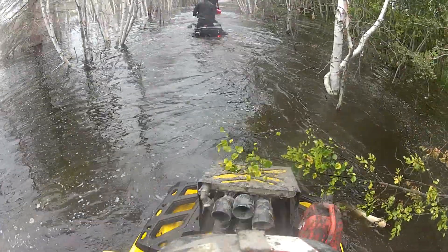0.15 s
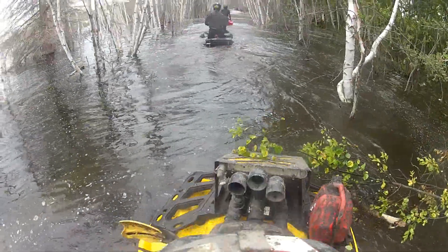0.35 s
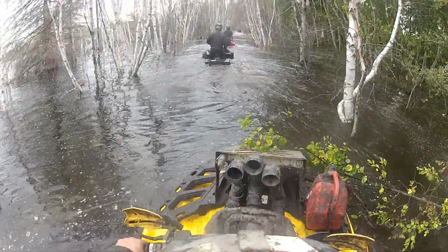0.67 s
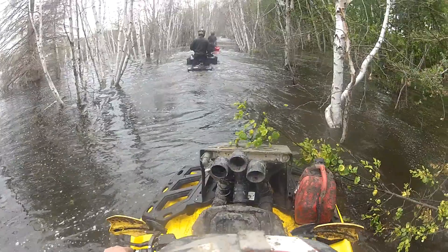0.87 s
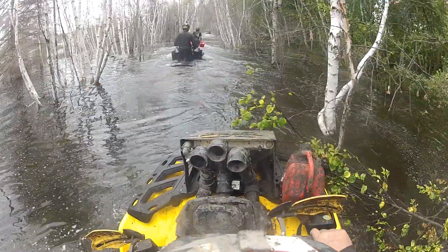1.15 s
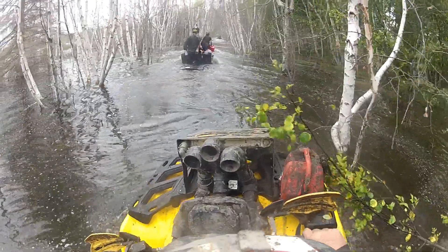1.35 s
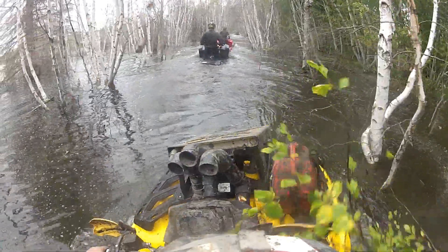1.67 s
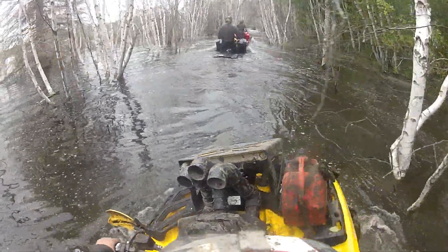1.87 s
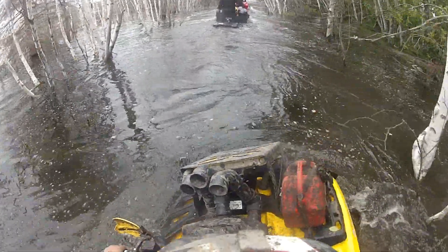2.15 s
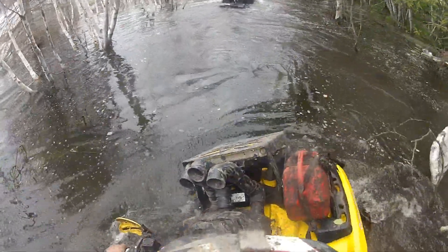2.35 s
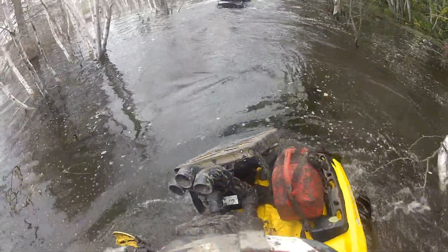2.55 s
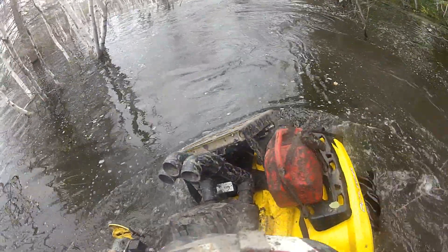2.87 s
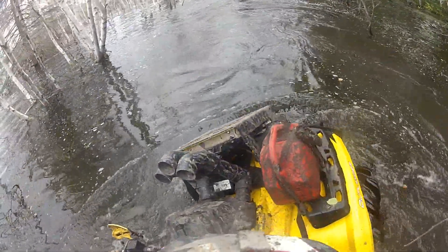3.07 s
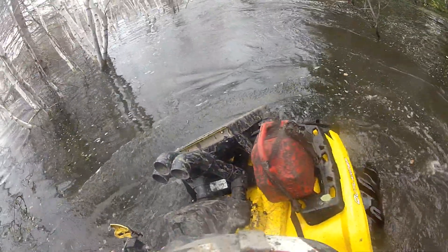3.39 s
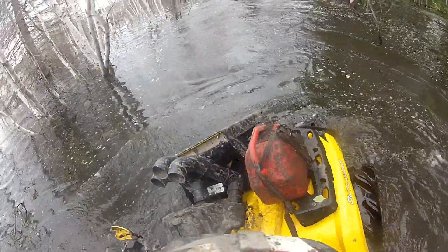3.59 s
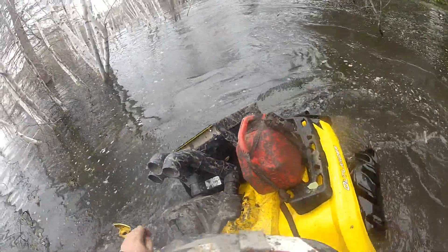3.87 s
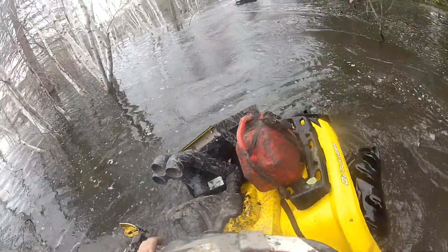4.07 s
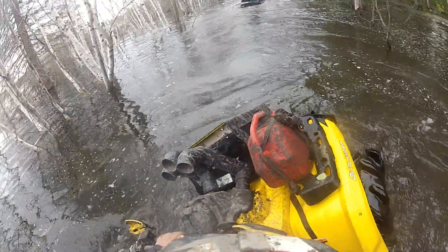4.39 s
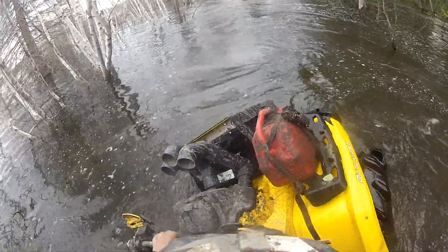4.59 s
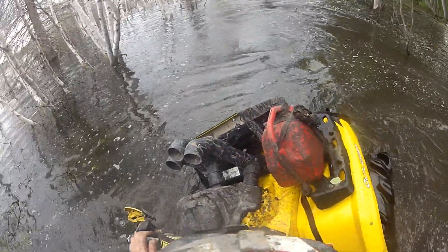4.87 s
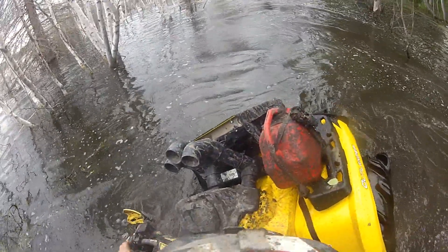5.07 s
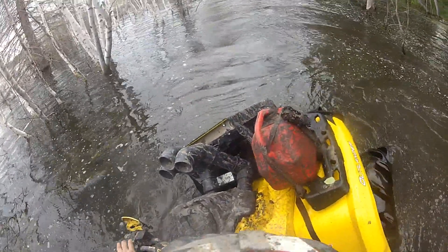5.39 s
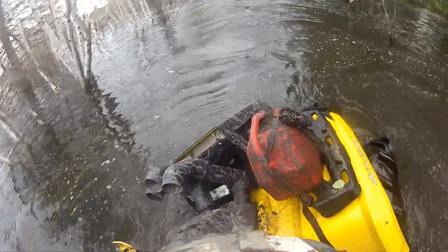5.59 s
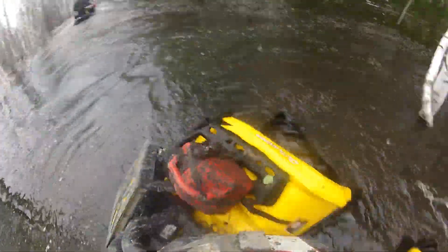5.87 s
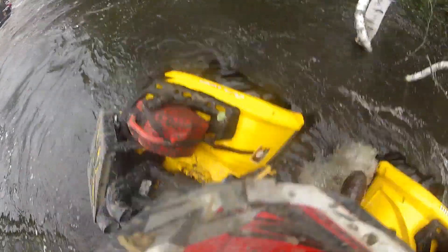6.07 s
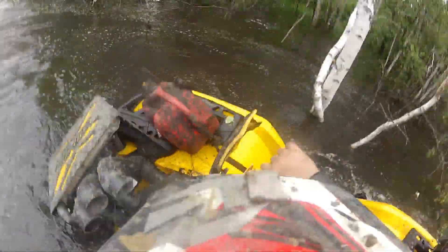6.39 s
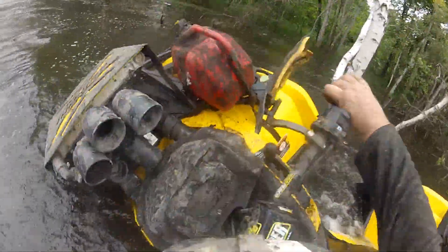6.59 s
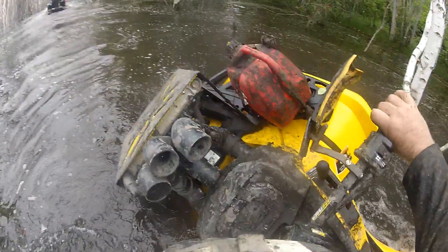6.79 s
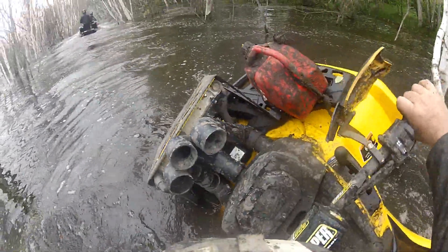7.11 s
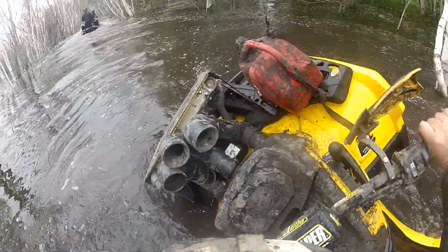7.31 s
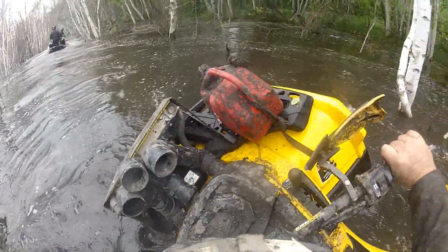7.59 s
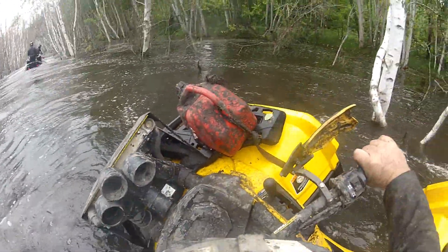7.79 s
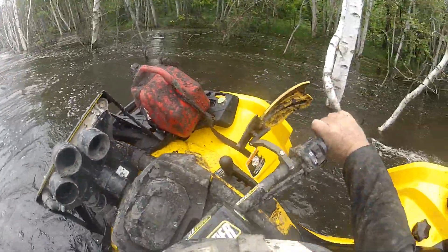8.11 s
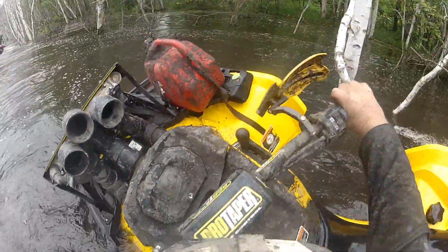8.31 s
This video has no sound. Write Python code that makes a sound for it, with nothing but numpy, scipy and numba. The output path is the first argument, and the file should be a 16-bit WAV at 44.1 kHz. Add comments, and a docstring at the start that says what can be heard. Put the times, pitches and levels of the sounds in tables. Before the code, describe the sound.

Close, muffled sound from a helmet camera: a V-twin quad pulls hard with a gurgling, growling exhaust through floodwater, then bogs down to a slow chug. A similar engine drones ahead. Water hisses around the wheels. Twigs snap against the housing just before two seconds; around six seconds come violent scrapes and thuds, and the engine revs up again, bubbling.

```python
"""Quad wading through a flooded wood

Heard from a camera microphone in a housing on the rider's helmet: a V-twin whose uneven firings ring the
exhaust and blow rising bubbles under water. A second, similar engine drones ahead as filtered firing pulses.
The wheels churn up hiss, droplets and spray, made of noise and tiny impacts, over a faint low rumble.
Twigs scratch and knock the housing, ringing its modes; the camera's limiter ducks after the hardest knocks."""
import sys
import numpy as np
from scipy import signal
from scipy.fft import rfft, irfft, next_fast_len
from scipy.io import wavfile
from scipy.ndimage import uniform_filter1d
from numba import njit

SR = 44100
rng = np.random.default_rng(int(sys.argv[2]) if len(sys.argv) > 2 else 0)


def output_pcm(signal):
    """Save a mono or channel-first signal as 16-bit PCM at the path in sys.argv[1].

    Samples are clipped to [-1, 1] before scaling.
    """
    pcm = np.clip(np.atleast_2d(signal).T, -1, 1) * 32767
    wavfile.write(sys.argv[1], SR, np.round(pcm).astype(np.int16))


N = 372644
T = np.arange(N) / SR  # time of each sample, s


def undb(db):
    """Decibels to gain."""
    return 10 ** (np.asarray(db) / 20)


def curves(rows):
    """Each column of a table after its times, joined by straight lines."""
    times, *columns = np.transpose(rows)
    return [np.interp(T, times, column) for column in columns]


def unit(x):
    """Scaled to rms 1."""
    return x / np.sqrt(np.mean(x ** 2) + 1e-18)


def even(x, span_s):
    """Scaled to about rms 1 over every stretch of span_s; quicker flutter stays."""
    size = max(int(span_s * SR), 200)
    power = uniform_filter1d(uniform_filter1d(x ** 2, size), size)
    return x / np.sqrt(np.abs(power) + 1e-12)


def band(x, hz, width, order=1):
    """A resonance with gain 1 at its centre; higher orders have steeper sides."""
    low = np.hypot(hz, width / 2) - width / 2
    sos = signal.butter(order, [low, low + width], "band", fs=SR, output="sos")
    return signal.sosfilt(sos, x + 1e-18)


def colour(x, tone):
    """Filter by a spectrum of (pitch_hz, level_db) points, joined on a log pitch scale."""
    hz, db = np.transpose(tone)
    size = next_fast_len(N)
    bins = np.maximum(np.fft.rfftfreq(size, 1 / SR), 1)
    gain = undb(np.interp(np.log(bins), np.log(hz), db))
    return irfft(rfft(x, size) * gain, size)[:N]


def walk(rate):
    """Slow chance of rms 1: random levels held 1 / rate s and slewed twice."""
    size = int(SR / rate)
    steps = np.repeat(rng.standard_normal(N // size + 1), size)
    return unit(uniform_filter1d(uniform_filter1d(steps, size), size)[:N])


def humps(rows):
    """A sum of bell-shaped swells, one for each (centre_s, length_s, height)."""
    return sum(height * np.exp(-((T - s) / length) ** 2) for s, length, height in rows)


def clicks(times, sizes):
    """One impulse at each time."""
    return np.bincount(np.clip(times * SR, 0, N).astype(int), sizes, N + 1)[:N]


def grains(per_s, spread):
    """Random tiny impacts of either sign, with levels on average 'spread' dB above the faintest."""
    place, sign, luck = rng.random((int(per_s * N / SR), 3)).T
    sizes = undb(-spread * np.log(np.maximum(luck, .001)))  # many faint, a few strong
    return unit(clicks(place * N / SR, np.sign(sign - .5) * sizes))


def firings(hz, second_db, scatter_db, jitter_s):
    """Times and strengths of the firings of a V-twin: its cylinders fire 280 and 440 degrees apart."""
    cycles = np.cumsum(hz) / SR  # four-stroke cycles of 720 degrees
    turns = (np.arange(int(cycles[-1]) + 1)[:, None] + [0, 280 / 720]).ravel()
    late, strength = rng.standard_normal((2, len(turns)))
    times = np.interp(turns, cycles, T, right=2 * T[-1]) + jitter_s * late
    is_second = np.arange(len(turns)) % 2
    return times, undb(second_db * is_second + scatter_db * strength)


def rumble():
    """The helmet shakes faintly with the ride: deep noise around 24 Hz that slowly drifts in level."""
    shake = unit(band(rng.standard_normal(N), 24, 26, order=2))
    return undb(-42.0) * shake * undb(2 * walk(1.2))


def leader():
    """The same kind of engine, further off: firing pulses coloured by one fixed spectrum."""
    # the quad ahead: time_s, engine_cycles_hz, level_db
    ride = [(0, 29.01, -19), (1.3, 29.61, -20), (1.8, 29.51, -29.5), (2.3, 29.06, -21), (2.75, 29.1, -23.5),
            (3.2, 30.24, -21.5), (3.9, 30.72, -28), (4.6, 30.11, -19.5), (6.3, 28.38, -19),
            (7.0, 28.52, -21), (7.6, 28.5, -22.5), (8.45, 28.82, -34.5)]
    # its tone at the microphone: pitch_hz, level_db
    tone = [(40, -56), (70, -8.5), (120, 4), (175, 1.5), (240, -1.5), (300, -3), (380, -12), (520, -7),
            (640, -13.5), (800, -23), (2000, -71.5)]
    hz, db = curves(ride)
    pulses = clicks(*firings(hz, second_db=0.5, scatter_db=4.0, jitter_s=.00008))
    return undb(db) * unit(colour(pulses, tone))


def water():
    """Wheels churn the water: a fluttering hiss with droplets in it, which swells with every wave."""
    # water as heard through the housing: pitch_hz, level_db
    tone = [(300, -3), (700, -0.5), (1200, -1), (1600, -2.5), (2300, -4.5), (2900, -1), (3500, -10),
            (4300, -17.5), (4900, -14), (6000, -29.5), (7200, -22), (9500, -18.5), (13500, -34),
            (16000, -34.5)]
    # waves pushed up as the quad moves off or lurches: crest_s, level_db, rise_s, fall_s
    waves = [(.4, -40, .3, 0.57), (1.25, -33.5, 0.83, 0.52), (2.25, -35, 1, 0.45), (6.5, -31.5, 0.39, .2),
             (6.86, -33, 0.095, 0.5)]
    steady_db = -43.5
    power = undb(steady_db) ** 2
    for s, db, rise, fall in waves:
        swell = undb(db) * np.exp(np.minimum((T - s) / rise, (s - T) / fall))
        power = power + swell ** 2
    hiss = rng.standard_normal(N) * undb(1.68 * walk(30))
    drops = grains(per_s=900, spread=3.74)
    return np.sqrt(power) * unit(colour(hiss + undb(-7.5) * drops, tone))


def spray():
    """Water thrown up by the wheels patters back as fine, bright drops."""
    # bursts of spray: centre_s, length_s, level_db
    bursts = [(2.282, 0.087, -58), (6.918, 0.22, -45)]
    patter = unit(band(grains(per_s=3400, spread=3.1), 4500, 5900, order=2))
    return patter * humps([(s, length, undb(db)) for s, length, db in bursts])


def twigs():
    """Twigs snap, scrape and knock: each contact scratches, rings the wood and sounds the housing's modes."""
    # the housing's modes: pitch_hz, width_hz, level_db
    housing = [(573, 105, 31), (700, 150, -11), (1150, 240, -24), (2390, 160, -16)]
    # scratching on the housing: pitch_hz, level_db
    scratch_tone = [(250, 19.5), (700, 16), (1700, -1), (2700, -5.5), (4300, -6), (5200, -6), (6000, -23),
                    (7200, -5.5), (9500, -10), (15000, -24)]
    # twigs snap against the housing: peak_s, level_db, twig_ring_hz
    snaps = [(.968, -25, 2390), (1.827, -15.5, 1400), (1.838, -10, 1760), (1.855, -18, 1900),
             (1.875, -21, 2600), (1.884, -12.5, 2500), (1.932, -23.5, 2300), (1.963, -18.5, 2690),
             (5.079, -29, 1900), (5.962, -25, 2460), (6.073, -16, 3000), (6.084, -17, 3300),
             (6.458, -17, 3700), (6.596, -6, 2390)]
    # scrapes and softer knocks on the housing: peak_s, level_db, rise_s, t60_s, thud_over_scratch_db
    scrapes = [(1.9, -26, .06, .3, 4), (6.095, -17, .014, .18, 1), (6.148, -15.5, .016, .04, -1),
               (6.231, -4, .005, .06, 8), (6.33, -26, .006, .16, -6), (6.442, -17, .012, .089, -2.5),
               (6.555, -20, .019, .22, 1)]
    # blunt knocks on the housing: peak_s, level_db, thud_over_scratch_db, branch_ring_hz
    bumps = [(4.655, -30, 6, 1300), (4.935, -19, 4, 1300), (5.79, -19, 2, 1100), (6.016, -7.5, 4, 2430),
             (6.021, -7, 3, 730), (6.157, 28, 19, 2400), (6.272, -12, 7, 2400), (6.605, 14.5, 7.5, 2370),
             (7.17, -21.5, 3, 1100)]
    snap_rise_s, snap_t60_s, snap_thud_db = .0028, .042, -8
    bump_rise_s, bump_t60_s = .0013, .023
    scrape_ring_hz = 2670
    ring_db, ring_width_hz = -1.5, 500  # the wood's ring against the scratch

    scratch = even(colour(grains(per_s=3200, spread=2.4), scratch_tone), .012)
    contact = rng.standard_normal(N)
    thud = even(sum(undb(db) * band(contact, hz, width, order=2) for hz, width, db in housing), 0.019)
    touches = ([(s, db, snap_rise_s, snap_t60_s, snap_thud_db, ring_hz) for s, db, ring_hz in snaps]
               + [(*scrape, scrape_ring_hz) for scrape in scrapes]
               + [(s, db, bump_rise_s, bump_t60_s, thud_db, ring_hz) for s, db, thud_db, ring_hz in bumps])
    out = np.zeros(N)
    for s, db, rise, t60, thud_db, ring_hz in touches:
        near = (T > s - 10 * rise) & (T < s + 2 * t60)
        shape = np.exp(np.minimum((T[near] - s) / rise, (s - T[near]) * np.log(1000) / t60))
        ring = unit(band(scratch[near], ring_hz, ring_width_hz))
        twig = unit(scratch[near] + undb(ring_db) * ring)
        mix = (twig + undb(thud_db) * thud[near]) / np.hypot(1, undb(thud_db))
        out[near] += undb(db) * shape * mix
    return out


def chug():
    """Under the first hard pull the water lets go of the outlet and closes again: an even swing, in dB."""
    start_s, end_s, fade_s = 0.269, 1.18, 0.029
    rate_hz, swing_db = 7.38, 4.5
    inside = np.clip(np.minimum(T - start_s, end_s - T) / fade_s + 1, 0, 1)
    return swing_db * inside * np.sin(2 * np.pi * rate_hz * (T - start_s))


def echoes(x, trip_s, reflect):
    """Each pulse bounces up and down the long exhaust pipe, which spreads it out in time (an all-pass)."""
    delay = np.exp(-2j * np.pi * np.fft.rfftfreq(2 * N, 1 / SR) * trip_s)
    return irfft(rfft(x, 2 * N) * (delay - reflect) / (1 - reflect * delay), 2 * N)[:N]


def bubbles(times, sizes, low_hz, high_hz, cycles, lag_s, glide, count=10):
    """Each puff of gas breaks into bubbles that ring briefly and rise in pitch."""
    out = np.zeros(N)
    chance = rng.random((len(times) * count, 3))
    for start, size, (pick, wait, sign) in zip(np.repeat(times, count), np.repeat(sizes, count), chance):
        hz = low_hz + (high_hz - low_hz) * pick ** 1.5  # more low bubbles than high
        first = max(int((start - lag_s * np.log(1 - wait)) * SR), 0)
        length = max(min(int(cycles / hz * SR), N - first), 0)
        age = np.arange(length) * hz / SR / cycles  # 0 to 1 over the bubble's life
        ring = np.sin(2 * np.pi * cycles * age * (1 + glide * age)) * np.exp(-np.log(1000) * age)
        out[first:first + length] += np.sign(sign - .5) * size * np.sqrt(hz) * ring
    return out


def pipe(x, modes):
    """Neighbouring modes swing in opposite senses at the mouth; sloshing water sways each in level."""
    slosh_db = 2.6
    out = 0
    for k, (hz, width, db) in enumerate(modes):
        gain = undb(db + slosh_db * walk(12))
        out = out + (-1) ** k * gain * band(x, hz, width, order=2)
    return out


def exhaust():
    """Firings and bubbles ring the exhaust: throttle and revs shift the balance of its bands, depth muffles."""
    # own engine: time_s, engine_cycles_hz
    speed = [(0, 35.8), (0.15, 34.6), (0.27, 28.2), (0.58, 34.49), (0.97, 37.66), (1.18, 36.82),
             (1.3, 30.23), (1.55, 26.57), (1.9, 19.06), (2.1, 23.2), (2.4, 23.7), (2.8, 23.75),
             (3.25, 24.9), (3.6, 24.65), (4.35, 25.03), (4.7, 23.95), (5.25, 22.53), (5.6, 22.53),
             (6.16, 22.61), (6.35, 33.58), (6.6, 35.01), (6.95, 33.84), (7.7, 33.66), (8.17, 34.1),
             (8.45, 31.56)]
    # how the quad is driven: time_s, throttle (0-1), depth of the outlet under water (0-1)
    drive = [(0, 0.68, 0.19), (.25, 0.44, 0.6), (.58, 0.8, 0.48), (1.0, 0.9, 0.4), (1.35, 0.6, 0.81),
             (1.72, 0.67, 0.73), (1.92, 0.28, 0.66), (2.35, 0.87, 0.57), (2.76, 0.8, 0.55),
             (2.86, 0.5, 0.6), (3.5, 0.31, 0.91), (4.25, 0.27, 0.79), (4.7, 0.79, 0.29), (5.4, 0.46, 0.23),
             (6.05, 0.38, 0.26), (6.4, 0.08, 0.64), (6.72, 0.15, 0.7), (6.86, 0.28, 0.61),
             (7.25, 0.63, 0.76), (7.45, 0.68, 0.81), (7.6, 0.32, 0.51), (8.0, 0.27, 0.32),
             (8.45, 0.17, 0.26)]
    # big pockets of gas break out of the outlet: centre_s, length_s, strength (0-1)
    gulps = [(.36, 0.076, 0.6), (2.08, 0.075, 0.4), (3.19, 0.062, 0.99), (3.64, 0.073, 0.64),
             (3.87, 0.065, 0.98), (4.37, 0.036, 0.71), (4.6, 0.078, 0.3), (6.55, 0.056, 1),
             (7.28, 0.13, 0.79)]
    # resonances behind boom, hum, drone, growl, body and bark, a list for each: pitch_hz, width_hz, level_db
    pipes = [
        [(69.7, 21, -8)],
        [(120, 36, -9)],
        [(176.4, 35.5, -6)],
        [(211.9, 26, -3)],
        [(265.3, 26, 2), (324.5, 74.7, -1)],
        [(426, 76, 0), (514.8, 62, 2), (612, 116, -7.5)],
    ]
    # response of each of the six: rest_db, rev_db (per octave), full_throttle_db, full_depth_db, full_gulp_db
    response = [(-27.5, -2, 14.5, 0.5, 2), (-19, -4, 0, -2, 2), (-9.5, 11, 1.13, -11.5, 3.5),
                (-35, 15.5, 21, -3, 5), (-15, 2, 1.5, -10, 10), (-14, -0.2, 3, -19.5, 10)]
    # bubbles against firings in each of the six, outlet at the surface, at cruising speed: level_db
    bubble_levels = [-14, -6, -16, -13, -12, -15]
    bubble_depth_db, bubble_rev_db = 14, 3  # their rise at full depth, and per octave of speed
    cruise_hz = 28
    slop_db, slop_per_s = 1.0, 13  # water slops over the outlet and makes the whole exhaust lumpy

    (hz,), (throttle, depth) = curves(speed), curves(drive)
    octaves = np.log2(hz / cruise_hz)
    gulp = humps(gulps)
    surge_db = chug() + slop_db * walk(slop_per_s)
    levels = [rest_db + rev_db * octaves + open_db * throttle + deep_db * depth + gulp_db * gulp + surge_db
              for rest_db, rev_db, open_db, deep_db, gulp_db in response]

    unsteady_hz = hz * (1 + .004 * walk(14))
    times, sizes = firings(unsteady_hz, second_db=-.5, scatter_db=1.6, jitter_s=.00007)
    pulses = echoes(clicks(times, sizes), trip_s=.0114, reflect=.58)
    gurgle = bubbles(times, sizes, low_hz=50.8, high_hz=764.6, cycles=23.0, lag_s=0.005972, glide=0.14)
    out = 0
    for modes, db, bubble_db in zip(pipes, levels, bubble_levels):
        drowned = undb(bubble_db + bubble_depth_db * depth + bubble_rev_db * octaves)
        clean = even(pipe(pulses, modes), 0.16)
        wet = even(pipe(gurgle, modes), 0.16)
        out = out + undb(db) * (clean + drowned * wet) / np.hypot(1, drowned)

    # noise that pulses with the firings, and upper overtones, both follow the bark
    puffs = signal.lfilter([1], [1, -np.exp(-1 / (0.014 * SR))], pulses)
    rasp = unit(band((puffs + 0.8) * rng.standard_normal(N), 880, 500, order=2))
    overtones = unit(band(pulses, 900, 480, order=3))
    bark_db = levels[-1]
    return out + rasp * undb(bark_db - 26) + overtones * undb(bark_db - 30)


def scene():
    """Everything reaches one microphone inside the housing."""
    mix = rumble() + leader() + water() + spray() + twigs() + exhaust()
    return np.tile(mix, (2, 1))


@njit
def limiter(x, ceiling, attack, recover):
    """The gain drops within a few samples on a peak over the ceiling and climbs steadily back."""
    y, gain = np.empty(len(x)), 1.
    for i in range(len(x)):
        gain = min(gain * recover, 1.)
        if abs(x[i]) * gain > ceiling:
            gain += attack * (ceiling / abs(x[i]) - gain)
        y[i] = x[i] * gain
    return y


def record(dry):
    """The camera limits and rounds the peaks; a faint image mirrored around 12 kHz adds a thin sizzle."""
    recover_db_per_s = 120
    ceiling, attack = 1.2, .4  # attack: share of the way per sample
    top_hz = 15400
    x = limiter(dry.mean(axis=0), ceiling, attack, float(undb(recover_db_per_s / SR)))
    x = x / (1 + np.abs(x / 1.08) ** 8) ** (1 / 8)  # peaks rounded off below 1.08
    ripple = np.cos(2 * np.pi * 12000 * T)
    x = x + undb(2.0) * np.gradient(x) * ripple  # the slope favours the treble
    low_pass = signal.ellip(8, .2, 70, top_hz, fs=SR, output="sos")
    return np.tile(signal.sosfilt(low_pass, x), (2, 1))


dry = scene()
out = record(dry)
output_pcm(out)
```